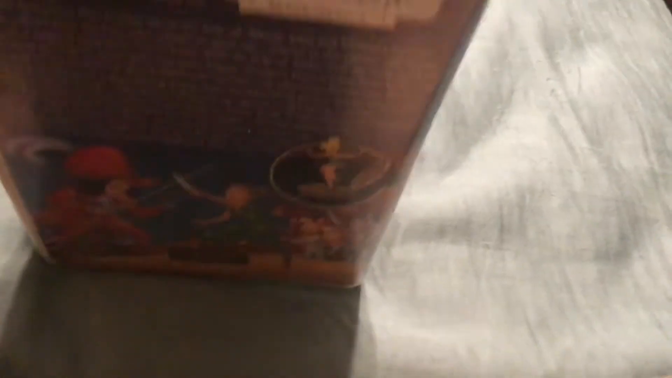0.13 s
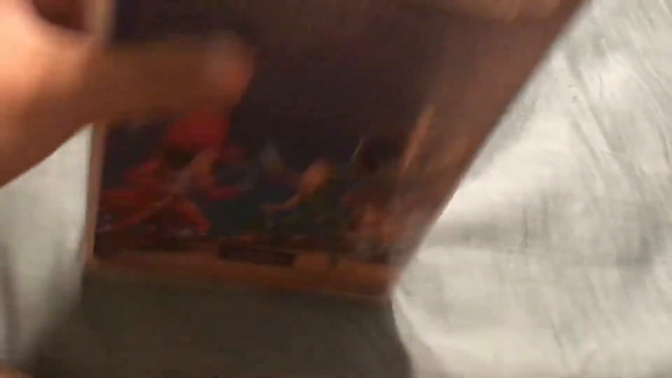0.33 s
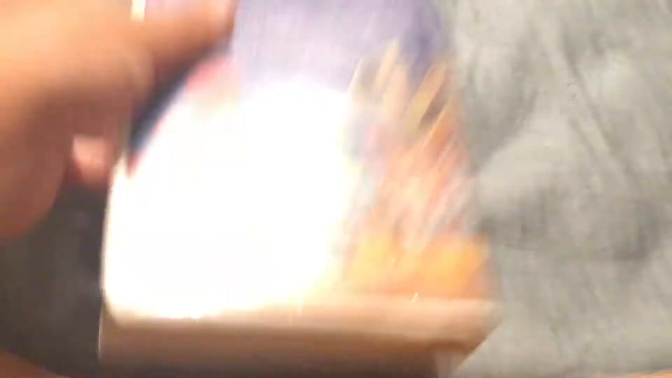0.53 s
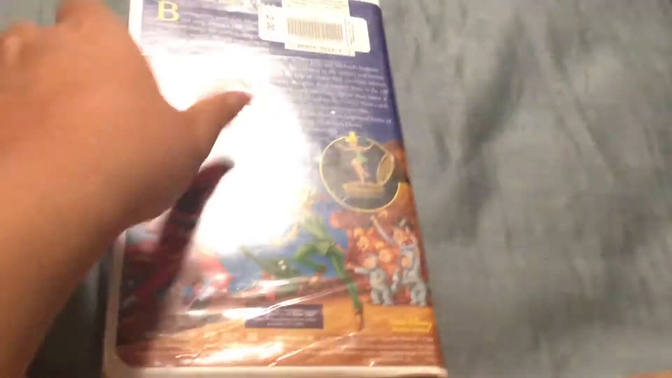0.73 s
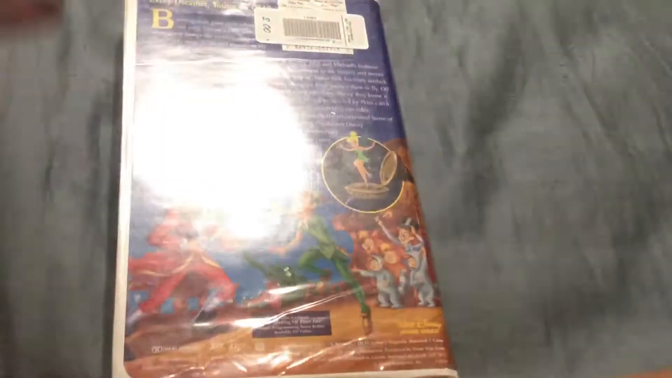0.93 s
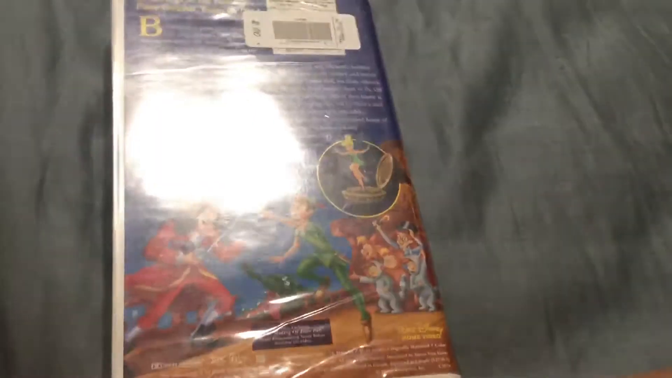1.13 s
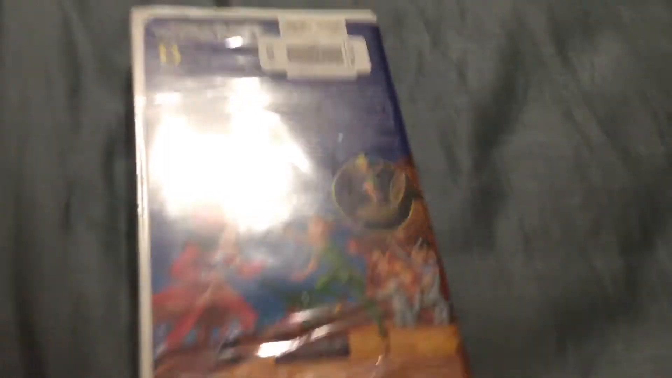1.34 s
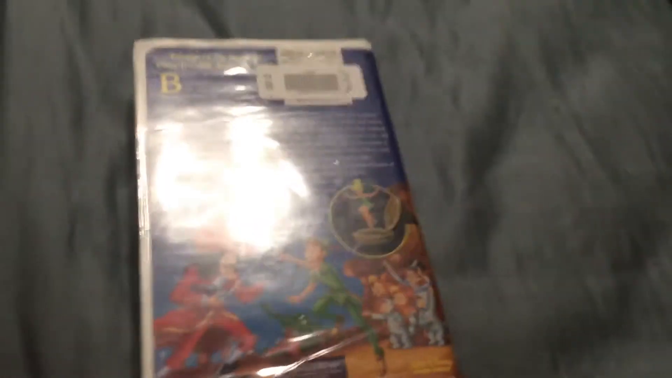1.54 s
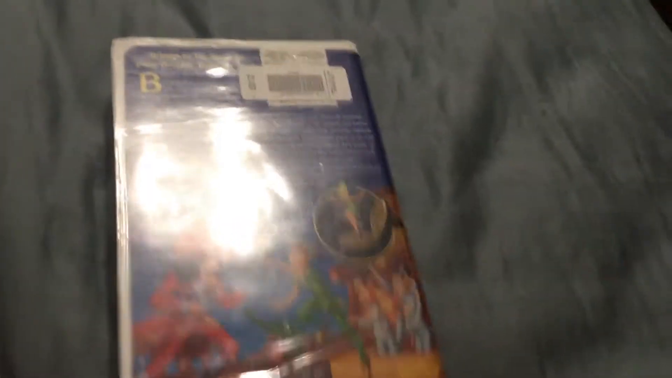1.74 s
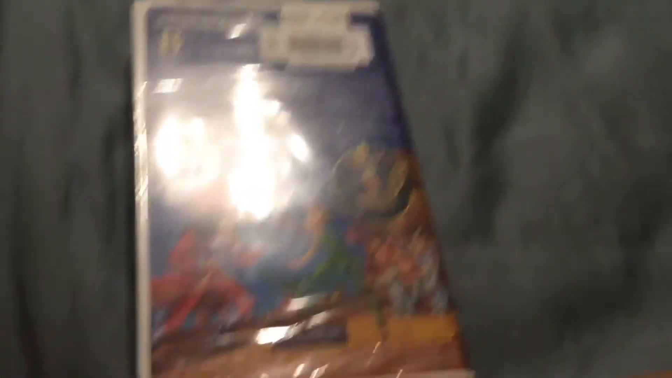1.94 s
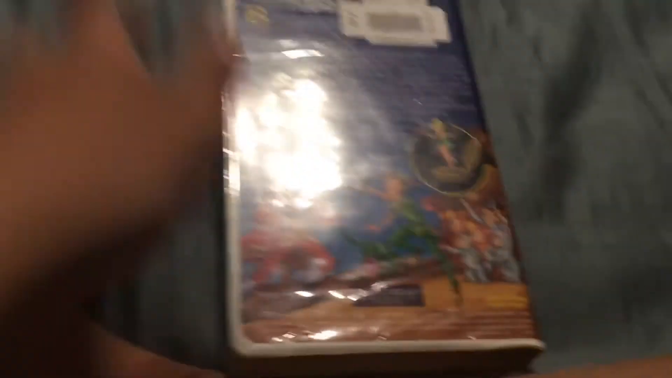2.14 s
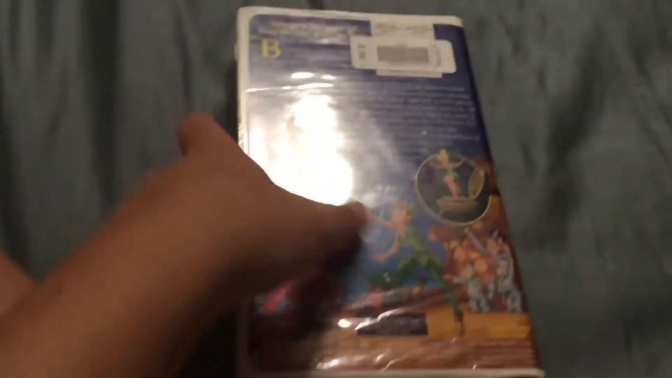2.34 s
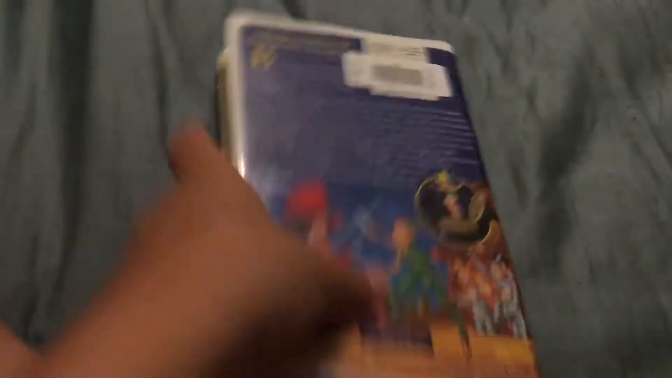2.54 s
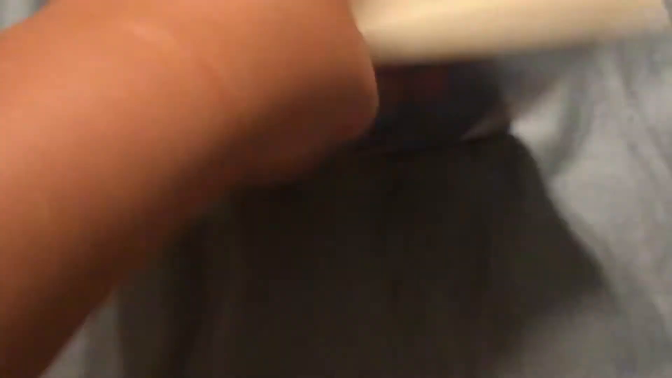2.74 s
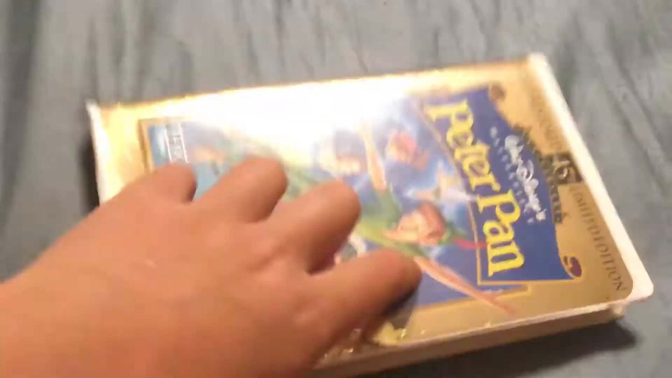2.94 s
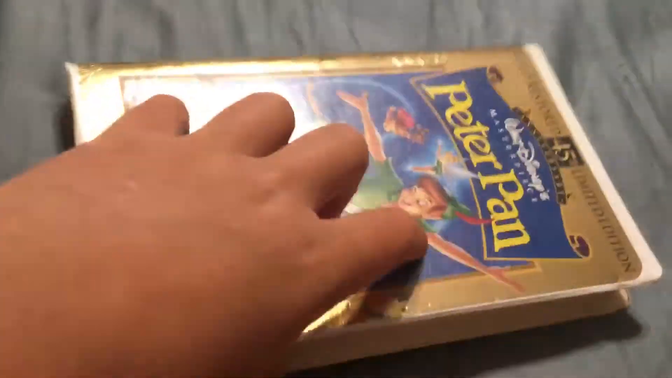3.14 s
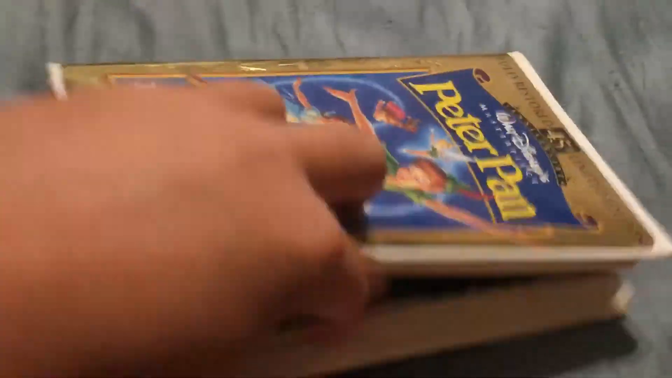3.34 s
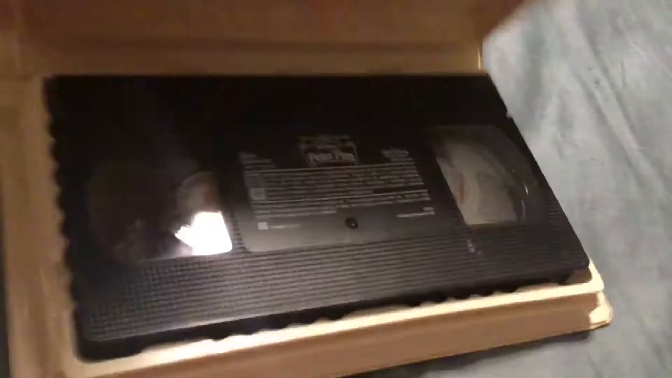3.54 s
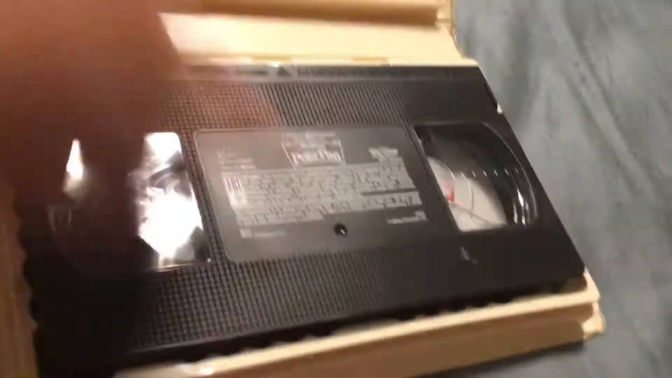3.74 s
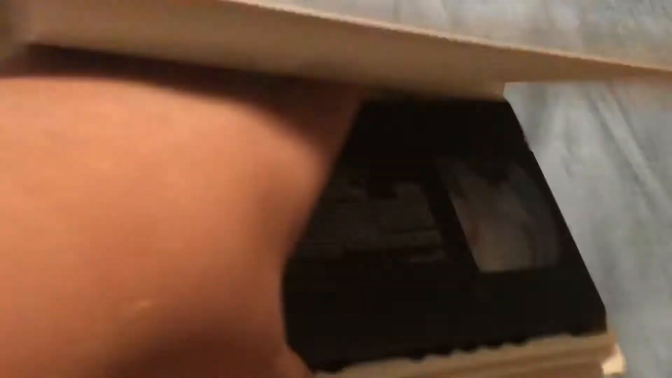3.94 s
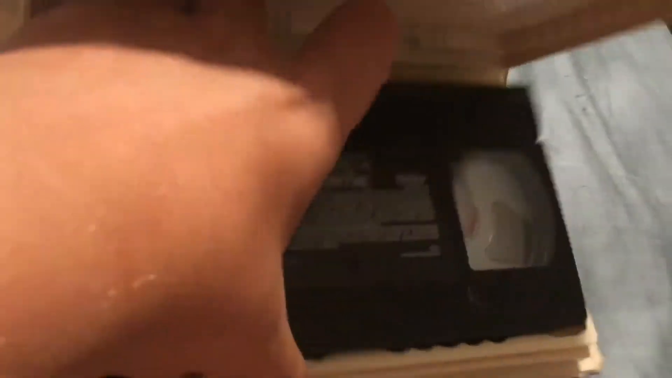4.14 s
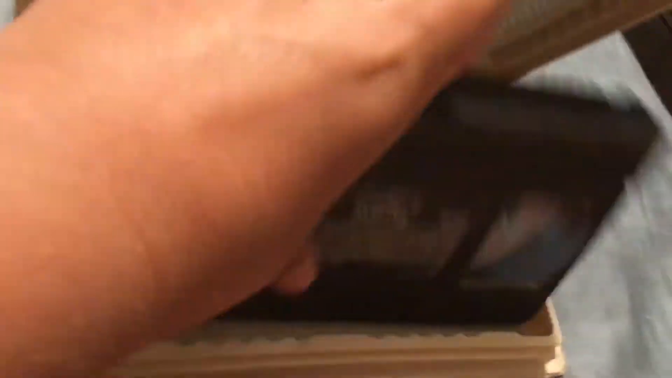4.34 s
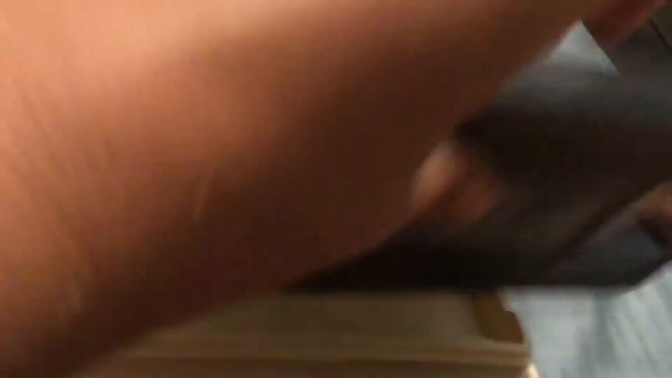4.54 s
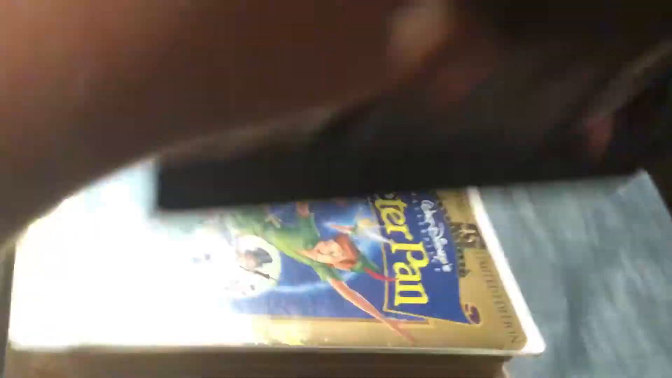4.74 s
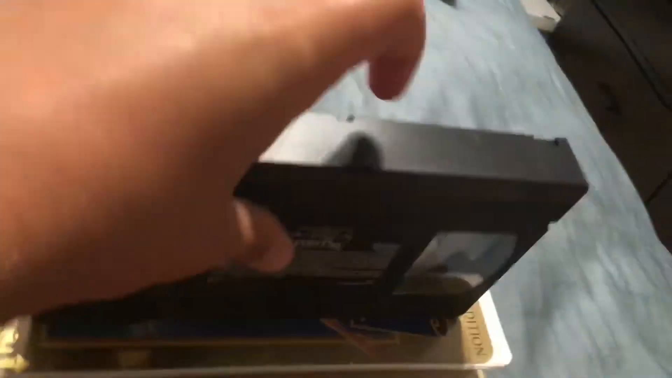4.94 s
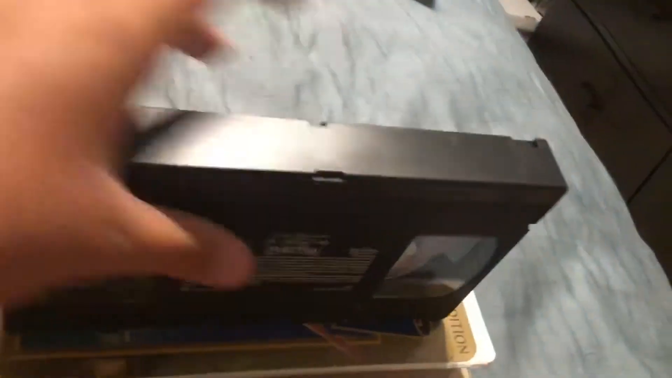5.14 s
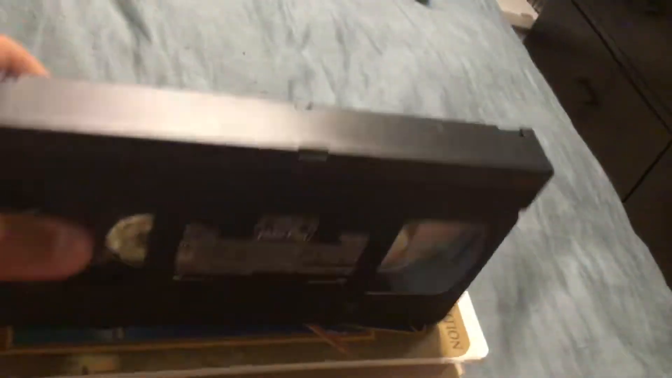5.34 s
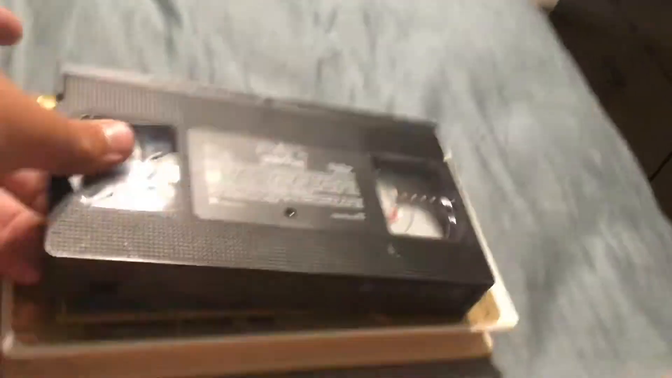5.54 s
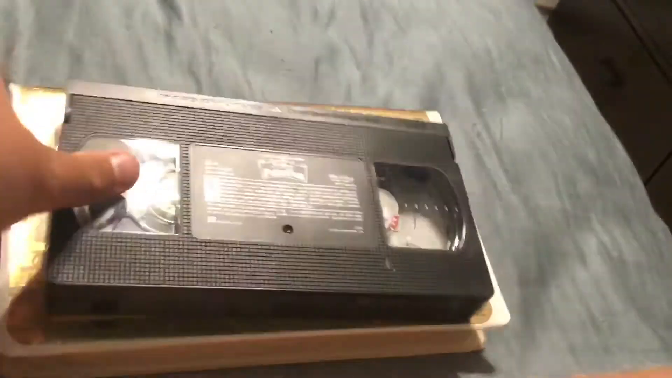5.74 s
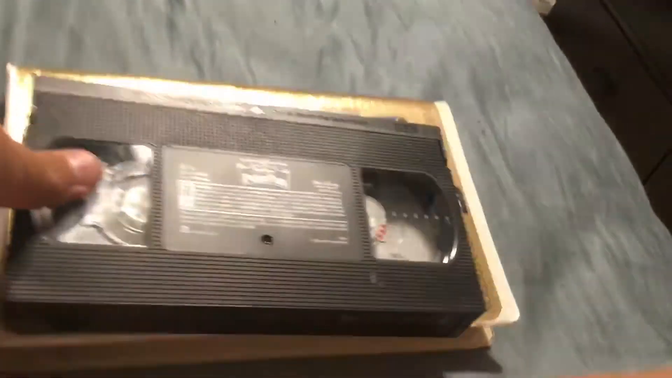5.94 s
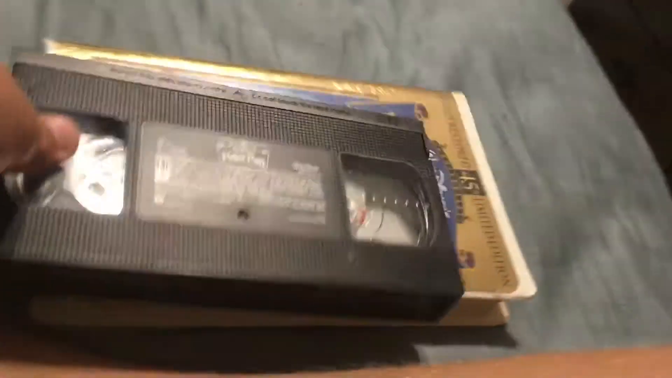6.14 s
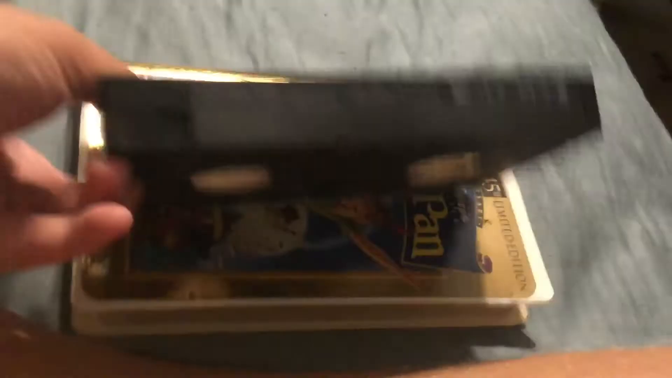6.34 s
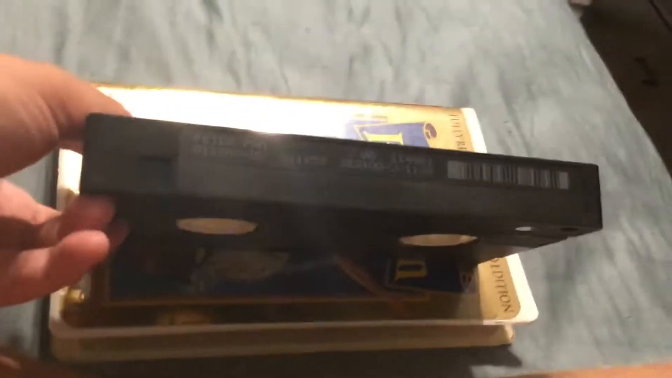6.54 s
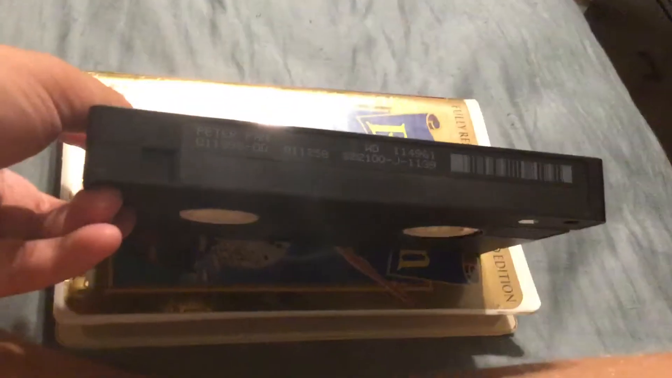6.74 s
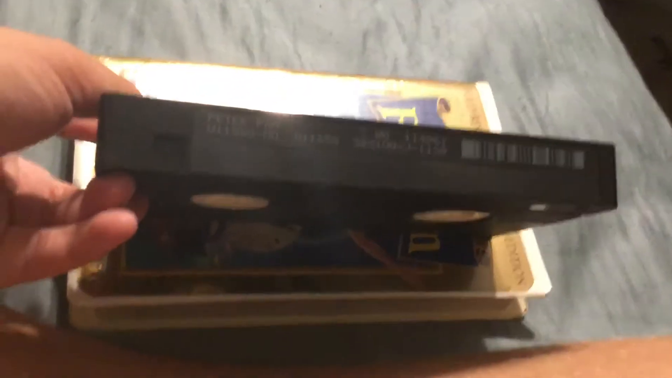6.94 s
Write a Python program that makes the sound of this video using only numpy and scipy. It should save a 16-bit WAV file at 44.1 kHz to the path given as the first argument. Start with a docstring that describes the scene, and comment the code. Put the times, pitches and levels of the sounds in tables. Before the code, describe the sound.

Close to a phone microphone in a small soft bedroom, fingers slide over a hollow plastic case. It drops with a boomy knock, then lies almost silent over a low pulsing hum. It is turned again, snapped open, and the cassette pulled out in a crackling run of clacks, peaking in one loud clunk. Smaller clicks and rubs follow, then a last sharp clack and quiet.

```python
"""Knocks and snaps of a soft plastic cassette case, close to a phone microphone: a hand turns it over on
a bed, opens it and lifts the cassette out. Bursts of tiny slips ring the thin walls, a soft blow booms the
hollow, and treble ticks. Sliding skin is shaped noise that drags, swishes and hisses; two squeaks are rising
tones. Behind lie a short bedroom tail, two machine hums slightly out of step, and a low noise room tone."""
import sys
import numpy as np
from scipy import signal
from scipy.fft import rfft, irfft
from scipy.io import wavfile
from scipy.ndimage import uniform_filter1d

SR = 44100
rng = np.random.default_rng(int(sys.argv[2]) if len(sys.argv) > 2 else 0)


def wav_out(sig):
    """Save sig, one row per channel (or a flat mono array), as 16-bit PCM at SR to the path in sys.argv[1]."""
    wavfile.write(sys.argv[1], SR, np.round(np.clip(np.atleast_2d(sig).T, -1, 1) * 32767).astype(np.int16))


N = 307818

# Room tone: pitch_hz, level_db (per Hz)
ROOM_TONE_SPECTRUM = [(30, -94), (85, -82), (150, -81), (340, -90), (500, -100), (800, -108), (1200, -122),
                      (3200, -119), (7000, -130), (16000, -134)]
# Bedroom tail: pitch_hz, t60_s
ROOM_DECAY = [(200, 0.15), (2000, 0.099), (10000, 0.052)]

# Two hums: the mains buzz and the turning rate of the motor
MAINS_HZ, MOTOR_HZ = 119.97, 58.65
CANCEL_S = 1.425  # a moment when the two hums oppose each other

# Fingers sliding, a row per stroke: start_s, length_s, drag_db (through the case), swish_db (sleeve),
# hiss_db (skin), pitch_hz (wall rubbed); levels are before the wall resonance and the extra top
STROKES = [(0.0, 0.082, -73.5, -72.5, -61, 1580), (0.125, 0.1, -80, -78, -58, 1597),
           (0.247, 0.12, -60, -71, -65, 1406), (0.387, 0.24, -65.5, -67, -63, 1997),
           (0.572, 0.14, -52.5, -68, -64.5, 1103), (0.737, .1, -68, -74, -73, 1013),
           (0.862, 0.12, -66.5, -63.5, -61, 2345), (2.077, 0.26, -70.5, -69.5, -63, 1326),
           (2.293, 0.38, -59.5, -85, -71, 1338), (2.592, 0.15, -73.5, -70, -65.5, 1508),
           (2.778, 0.18, -57, -76, -67, 1740), (3.007, 0.046, -69.5, -80, -66.5, 1500),
           (3.12, 0.093, -66.5, -77.5, -70, 1802), (3.264, 0.093, -48, -60, -54.5, 1627),
           (3.434, 0.2, -64, -63, -61, 2360), (3.723, .11, -70, -72.5, -68.5, 700),
           (3.907, 0.094, -52, -73.5, -68, 637), (4.079, .11, -50.5, -76, -58.5, 1011),
           (4.248, 0.08, -40.5, -54, -47.5, 765), (4.365, 0.22, -46.5, -51.5, -51.5, 906),
           (4.715, 0.22, -56, -61.5, -60, 2014), (4.831, 0.21, -61.5, -74, -65, 2670),
           (5.096, 0.081, -62, -69, -64.5, 757), (5.236, 0.047, -59.5, -63, -56.5, 2735),
           (5.377, 0.024, -52, -66, -58.5, 1963), (5.489, 0.018, -39.5, -51.5, -53.5, 1863),
           (5.622, 0.089, -53, -65.5, -61, 3900), (5.815, 0.46, -61, -68, -60.5, 1790),
           (6.221, 0.096, -48, -52.5, -50.5, 747), (6.34, 0.099, -56, -65.5, -64, 809)]
# Steady faint noise floor under the strokes: drag_db, swish_db, hiss_db
FLOOR_DB = (-78.5, -82.5, -84.5)
# Colour of the drag through the case: pitch_hz, level_db (per Hz, relative)
DRAG_SPECTRUM = [(100, -22.5), (280, 5), (500, -2.5), (1100, -7.5), (1800, -12.5), (2400, -12), (5000, -40)]
# Colour of the sleeve: pitch_hz, level_db (per Hz, relative)
SWISH_SPECTRUM = [(1200, -35.5), (2700, -6), (3600, -0.5), (4900, -3), (6500, -10), (9000, -39)]
# Colour of the skin hiss, and of the tick in a knock: pitch_hz, level_db (per Hz, relative)
HISS_SPECTRUM = [(4000, -23), (7000, -6), (8500, 2), (11000, -2), (14000, 1)]
START_DB_PER_S, STOP_DB_PER_S = 398, 247  # how fast a stroke swells before it holds, and fades after
ARCH_DB = 2.5  # how far the ends of a stroke lie below its middle
# Wall resonance under the fingers: width, level against the drag, and rms share by which its pitch strays
RUBBED_WIDTH_HZ, RUBBED_DB, WANDER = 150, -9, .03
# Many small scuffs a second, at random moments, roughen the drag: rate, average strength, fade time constant
SCUFFS_PER_S, SCUFF_DB, SCUFF_S = 40, 0.5, .003
GRAINY_DB, GRAIN = -77, .12  # above this drag the grip turns uneven, in dB for each dB
# Top of the hiss: lower edge, level where hiss equals drag, and growth in dB per dB of hiss over drag
BRIGHT_HZ, BRIGHT_DB, BRIGHTER = 11500, -10, 0.53

# Plastic squeaks: start_s, length_s, pitch_hz (at the middle), peak_db
SQUEAKS = [(4.132, 0.055, 998, -44), (6.161, 0.033, 326, -44)]
SQUEAK_RISE = 0.046  # share by which the pitch climbs during a squeak

# Knocks and snaps: time_s (halfway up the rise), peak_db (wall ring alone), thud_db and tick_db (peaks
# against the wall ring), pitch_hz (spot struck), fall_ms (dying away of the contact)
KNOCKS = [(0.251, -37, 5, -2, 620, 8.5), (0.277, -44, 5, 6, 670, 12), (0.308, -44.5, -1, 8, 4500, 8.4),
          (0.317, -39, 3.5, 3, 665, 15.5), (0.466, -44.5, -21, 1, 2490, 19),
          (0.573, -17.5, 5.5, 0.5, 1630, 17.2), (0.585, -9, 2, -8, 887, 18),
          (.608, -23, -10.5, -6, 910, 12), (0.617, -23.5, -14, -8.5, 1800, 22.5),
          (0.629, -27, -8, -1.5, 1920, 6.3), (0.682, -35.5, 3.5, -2.5, 1690, 13.7),
          (0.694, -33.5, 4.5, -9, 1500, 16.2), (0.731, -36.5, 3, -10, 1080, 13.5),
          (1.66, -53, -6, -1, 1500, 7.1), (1.532, -53, 3, -17, 560, 8.4),
          (1.733, -45.5, 15.5, -7.5, 714, 19.3), (2.391, -45, 0, 4.5, 3680, 6.5),
          (2.5, -41.5, 1.5, -1.5, 1300, 20.7), (2.594, -36, -17, -2.5, 596, 29.3),
          (2.759, -38, 0.5, -2, 3040, 16.4), (2.886, -35.5, 3, -2, 540, 19),
          (2.902, -29.5, 10, -3, 600, 20.5), (3.266, -33, -19, 0, 1600, 9.9),
          (3.277, -29.5, 0, 0.5, 1640, 13.8), (3.312, -29, -2, 4, 1220, 17),
          (3.334, -16, -5.5, -3.5, 1510, 8.1), (3.35, -24.5, 1, -3.5, 750, 12),
          (3.429, -34, -5.5, -8, 1130, 7), (3.481, -32.5, -3.5, 6.5, 2940, 7.1),
          (3.549, -29, -13.5, -1, 690, 14), (3.563, -24.5, 4.5, 3, 730, 19),
          (3.585, -9.5, -19.5, 0.5, 3830, 12.4), (3.596, -20.5, -2, -1.5, 2513, 11.2),
          (3.815, -40.5, -8.5, -5, 610, 25), (3.845, -37, -12, -7.5, 595, 14.4),
          (3.899, -12.5, 0, -2, 1080, 17.3), (3.935, -29, 2, 5, 567, 19),
          (3.979, -29.5, 1.5, 1.5, 670, 9.8), (4.015, -35.5, 7.5, -1, 1020, 10.8),
          (4.109, -21.5, -22, -1.5, 730, 17.5), (4.134, -18, -21, 0.5, 2330, 17.6),
          (4.147, -15, -4.5, 2.5, 4300, 8.7), (4.228, -35, -12, 1, 1040, 10.5),
          (4.241, -22.5, -19, -10.5, 1170, 19.3), (4.253, -18.5, -1.5, 0, 980, 17.4),
          (4.266, -14, -11.5, -1, 1120, 18.6), (4.325, -29.5, -4, 2.5, 654, 14),
          (4.37, -34, -6, 5.5, 2300, 19), (4.399, -32, 8.5, 1, 600, 12.3),
          (4.423, -16.5, -14.5, -1.5, 3140, 11.4), (4.431, -26, -13.5, 0, 3610, 6),
          (4.44, -20, -24.5, -1, 2925, 19), (4.447, -9.5, -25, 0.5, 962, 15.4),
          (4.462, -22, -10.5, -7, 910, 11), (4.482, -13, -26.5, -4.5, 670, 10.7),
          (4.511, -17, -21.5, 4, 3660, 33), (4.535, -10, -20, -11.5, 750, 14.5),
          (4.539, -10.5, -33, -1, 2120, 12.8), (4.546, -5.5, -23.5, -11, 2106, 6.7),
          (4.556, -24, -18.5, 11.5, 1935, 8.1), (4.575, -19.5, -6.5, 4, 2270, 13),
          (4.644, -21.5, -3.5, 4.5, 2730, 3.3), (4.655, -23, -8, -4, 585, 7.1),
          (4.795, -3, -25.5, -36, 681, 15.4), (4.802, 2.5, -13, -3.5, 520, 11.66),
          (4.81, -9, 2, -1, 635, 22.4), (4.88, -21.5, -39.5, -3, 1400, 5.9), (4.901, -22, -19, 4, 800, 6.2),
          (4.905, -13.5, 1.5, -5, 1040, 7.3), (5.108, -28, -30, -1.5, 750, 16.8),
          (5.369, -35, -10, -1, 3330, 18), (5.432, -34, -3, -6, 635, 27), (5.458, -10.5, -4, 2, 830, 11.25),
          (5.468, -13.5, -4, 2, 2400, 26.4), (5.516, -20.5, -13, -4.5, 2220, 10),
          (5.676, -36, -15, -11, 1600, 9), (5.684, -29, 12, 6, 3900, 7.4), (5.706, -37, -22, 13, 2200, 19),
          (6.14, -33, -13, -2, 3470, 12), (6.16, -32.5, -13.5, -20, 2000, 10.7),
          (6.262, -13.5, -2.5, 8, 770, 13.4), (6.263, -10, -26.5, 2, 4750, 12.8),
          (6.338, -29, -24, 6, 700, 11), (6.351, -16, -3, -2.5, 2440, 11),
          (6.356, -14, -5, -4.5, 720, 13.8), (6.921, -46.5, -5, -8.5, 771, 13.3)]
# Boom of the hollow case, before each knock varies it: pitch_hz, level_db (relative), t60_s
HOLLOW_MODES = [(67.95, -11, .063), (97, 1.5, .07), (161, 6, .045), (232, 3.5, 0.049), (288, 1, .04),
                (338.6, 5.5, 0.048)]
# Relative loudness of the wall modes, before the place of the blow counts: pitch_hz, level_db
WALL_LEVELS = [(400, -23.5), (650, -8), (1050, -5), (1800, 7), (3000, 9.5), (4300, 13), (6500, 10.5)]
# Cycles until a free wall mode has lost 60 dB; the hand damps all modes besides
WALL_CYCLES, GRIP_T60_S = 20, 0.043
BUILD_UP = .28  # share of the dying-away time that a contact takes to reach full force
LET_GO = 1.31  # above 1, a contact holds a moment and then stops quickly
PUSH_S, SOFTER = 0.00039, 0.3  # base width of the soft blow, and its growth in dB for each dB of thud
USUAL_S, TIGHTER = 0.013, 1.2  # contacts shorter than usual shorten blow and boom, by this power


def gain_of(db):
    """Decibels to a factor."""
    return 10 ** (np.asarray(db) / 20)


def evened(x):
    """Scales to rms 1."""
    return x / np.sqrt(np.mean(x ** 2) + 1e-20)


def smoothed(x, size):
    """Two passes of a running mean, size in samples."""
    return uniform_filter1d(uniform_filter1d(x, size), size)


def read(points, hz):
    """Reads a spectrum table on a log-frequency axis."""
    f, value = np.transpose(points)
    return np.interp(np.log(hz + 1), np.log(f + 1), value)


def coloured(x, points):
    """Filters x by the spectrum of a table."""
    hz = np.fft.rfftfreq(len(x), 1 / SR)
    return irfft(rfft(x) * gain_of(read(points, hz)), len(x))


def ringing(hz, db, t60):
    """Answer of a set of modes to one click: decaying sines."""
    t = np.arange(4000)[:, None] / SR
    decay = gain_of(db - 60 * t / abs(t60))
    return (decay * np.sin(2 * np.pi * hz * t)).sum(1)


def resonate(x, hz, width_hz):
    """A moving resonance: shifts the curve hz down to zero, smooths, and shifts back."""
    turn = np.exp(2j * np.pi * np.cumsum(hz) / SR)
    r = np.exp(-np.pi * width_hz / SR)
    return (turn * signal.lfilter([1 - r], [1, -r], x / turn)).real


def crumbs(chance, spread_db):
    """A run of tiny slips: noise whose samples differ widely in size."""
    sign = np.sign(chance[0] - .5)
    return sign * gain_of(-spread_db * np.log(np.clip(chance[1], .003, 1)))


def room_tone():
    """Low rumble and faint air: coloured noise whose level swells a little."""
    swell_db = 2.0 * evened(smoothed(rng.standard_normal(N), 4000))
    air = coloured(rng.standard_normal(N), ROOM_TONE_SPECTRUM) * np.sqrt(SR / 2)  # to dB per Hz
    return air * gain_of(swell_db)


def hum():
    """Mains buzz beats against the second order of a motor that turns a little slower."""
    t = np.arange(N) / SR - CANCEL_S
    mains = gain_of(-50.0) * np.sin(2 * np.pi * MAINS_HZ * t)
    second = gain_of(-51.5) * np.sin(2 * np.pi * 2 * MOTOR_HZ * t)
    first = gain_of(-61.5) * np.sin(2 * np.pi * MOTOR_HZ * t)
    return mains - second + first


def bedroom(x):
    """Short soft tail of the room: noise with each band dying at its own speed."""
    hz, t, bands = signal.stft(rng.standard_normal(SR // 2), SR, nperseg=256)
    decay = gain_of(-60 * t / abs(read(ROOM_DECAY, hz))[:, None])
    tail = signal.istft(bands * decay, SR, nperseg=256)[1]
    tail = np.pad(tail, (200, 0))  # the tail comes 4.5 ms late
    return signal.fftconvolve(x, tail / np.linalg.norm(tail))[:N]


def rubbing():
    """Skin sticks and slips unevenly, heard through the case, off the sleeve and directly."""
    t, fine = np.arange(0, N + 64, 64) / SR, np.arange(N) / SR
    power = gain_of(FLOOR_DB)[:, None] ** 2 * np.ones(len(t))  # rows: drag, swish, hiss
    weighted_pitch = power[0] * 1500.  # strokes that overlap share the pitch by drag power
    for start, length, *levels_db, hz in STROKES:
        swell_db = -START_DB_PER_S * np.maximum(start - t, 0)
        fade_db = -STOP_DB_PER_S * np.maximum(t - start - length, 0)
        arch_db = -ARCH_DB * np.clip(2 * (t - start) / length - 1, -1, 1) ** 2
        stroke = gain_of(np.add.outer(levels_db, swell_db + fade_db + arch_db)) ** 2
        power = power + stroke
        weighted_pitch = weighted_pitch + stroke[0] * hz

    above_db = np.maximum(10 * np.log10(power[0]) - GRAINY_DB, 0)
    uneven_db = GRAIN * np.interp(fine, t, above_db)
    grip_db = uneven_db * evened(smoothed(rng.standard_normal(N), 300))
    slips = crumbs(rng.random((2, N)), spread_db=2.5) * gain_of(grip_db)

    scuff_starts = (rng.random(N) < SCUFFS_PER_S / SR) * rng.exponential(1, N)
    scuffs = signal.lfilter([1], [1, -np.exp(-1 / (SCUFF_S * SR))], scuff_starts)
    rough_slips = slips * (1 + gain_of(SCUFF_DB) * scuffs)

    drag = evened(coloured(rough_slips, DRAG_SPECTRUM))
    swish = evened(coloured(slips, SWISH_SPECTRUM))
    hiss = evened(coloured(slips, HISS_SPECTRUM))

    treble = signal.butter(2, BRIGHT_HZ, "high", fs=SR, output="sos")
    top = evened(signal.sosfiltfilt(treble, hiss))
    top_db = BRIGHT_DB + BRIGHTER * 10 * np.log10(power[2] / power[0])
    hiss = hiss + top * np.interp(fine, t, gain_of(top_db))

    stray = 1 + WANDER * evened(uniform_filter1d(rng.standard_normal(len(t)), size=20))
    wall_hz = np.interp(fine, t, stray * weighted_pitch / power[0])
    drag = drag + gain_of(RUBBED_DB) * evened(resonate(rough_slips, wall_hz, RUBBED_WIDTH_HZ))
    return sum(x * np.interp(fine, t, np.sqrt(p)) for x, p in zip((drag, swish, hiss), power))


def squeaks():
    """Two plastic faces catch in a regular rhythm for a moment: a faint rising tone."""
    out = np.zeros(N)
    for start, length, hz, db in SQUEAKS:
        u = np.arange(0, length, 1 / SR) / length
        pitch = hz * (1 + SQUEAK_RISE * (u - .5))
        tone = np.sin(2 * np.pi * np.cumsum(pitch) / SR)
        out[round(start * SR):][:len(u)] += gain_of(db) * np.sqrt(np.sin(np.pi * u)) * tone
    return out


def wall_ring(slips, spot_hz, luck):
    """Thin walls have dense modes, bent by the grip; those far from the pitch of the spot ring less."""
    hz = np.geomspace(400, 7000, 30) * (1 + .03 * luck)
    octaves = np.log2(hz / spot_hz)
    slope_db = np.minimum(23.0 * octaves, -6.5 * np.minimum(octaves, 3.0))
    near_db = slope_db + 10.0 * np.exp(-(octaves / 0.32) ** 2)
    t60 = 1 / (hz / WALL_CYCLES + 1 / GRIP_T60_S)
    return signal.fftconvolve(slips, ringing(hz, read(WALL_LEVELS, hz) + near_db, t60))


def hollow_thud(slips, thud_db, fall, level_luck, pitch_luck):
    """A soft blow, with a little of the slips, booms the hollow case."""
    t = np.arange(4000) / SR
    tight = (fall / USUAL_S) ** TIGHTER
    width = PUSH_S * tight * gain_of(SOFTER * thud_db)
    push = np.exp(-((t - .004) / width) ** 2) + 0.067 * slips / abs(slips).max()
    hz, db, t60 = np.transpose(HOLLOW_MODES)
    hz = hz * (1 + 0.068 * pitch_luck[:len(hz)])
    return signal.fftconvolve(push, ringing(hz, db + 3. * level_luck[:len(hz)], t60 * tight))


def knock(peak_db, thud_db, tick_db, spot_hz, fall):
    """A short run of slips shakes the walls near the spot struck, pushes the hollow and ticks."""
    chance, luck = rng.random((3, 4000)), rng.standard_normal((3, 30))
    t = np.arange(4000) / SR
    rise = BUILD_UP * fall
    let_go = np.exp(-3 * (np.maximum(t - rise, 0) / fall) ** LET_GO)
    contact = np.minimum(t / rise, 1) ** 2 * let_go
    chatter_db = 4.0 * evened(smoothed(chance[2] - .5, 70))  # the parts bounce on each other
    slips = crumbs(chance, spread_db=3.5) * contact * gain_of(chatter_db)

    walls = wall_ring(slips, spot_hz, luck[0])
    thud = hollow_thud(slips, thud_db, fall, luck[1], luck[2])
    brief = slips * contact ** 0.1  # treble dies first
    tick = coloured(np.pad(brief, (0, len(walls) - len(slips))), HISS_SPECTRUM)
    walls, thud, tick = (x / abs(x).max() for x in (walls, thud, tick))
    return gain_of(peak_db) * (walls + gain_of(thud_db) * thud + gain_of(tick_db) * tick)


def handling():
    """All knocks, each placed so that its listed time falls halfway through the rise of the contact."""
    out = np.zeros(N + SR)
    for time_s, *row, fall_ms in KNOCKS:
        fall = fall_ms / 1000
        sound = knock(*row, fall)
        out[round((time_s - BUILD_UP * fall / 2) * SR):][:len(sound)] += sound
    return out[:N]


def scene():
    """Case and hand close by, with the bedroom tail, over the hum and room tone."""
    case = handling() + squeaks()
    close = case + rubbing()
    return (close + gain_of(-14) * bedroom(case) + hum() + room_tone())[None]


def record(dry):
    """The microphone loses the deepest bass and rounds off the loudest peaks; then the band limit."""
    bass_cut = signal.butter(4, 55, "high", fs=SR, output="sos")
    rounded = 1.3 * np.tanh(signal.sosfilt(bass_cut, dry) / 1.3)
    band_limit = signal.firwin(255, 15750, window=("kaiser", 9), fs=SR)  # low-pass, Hz
    return signal.oaconvolve(rounded, band_limit[None], "same")


dry = scene()
out = record(dry)
wav_out(out)
```